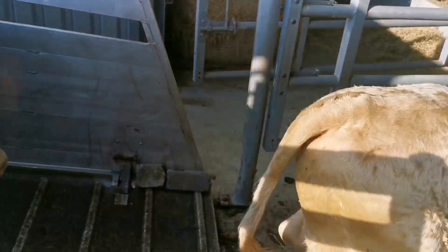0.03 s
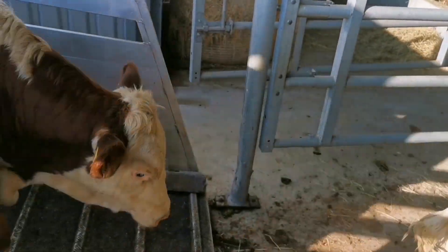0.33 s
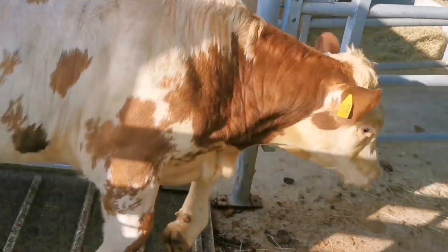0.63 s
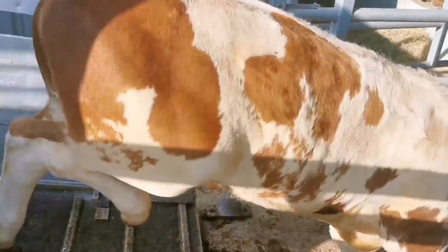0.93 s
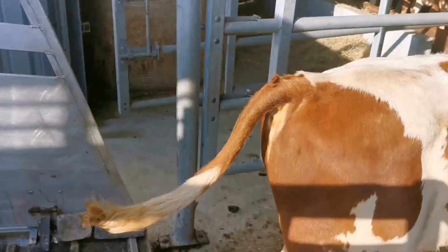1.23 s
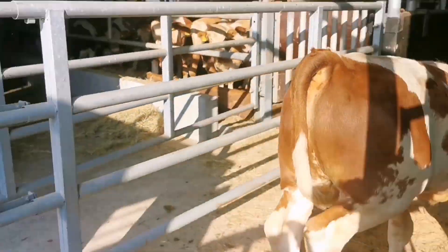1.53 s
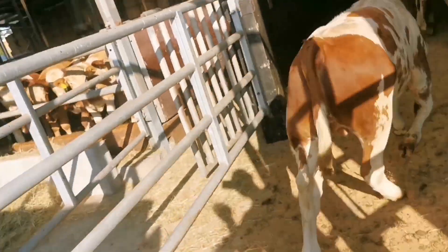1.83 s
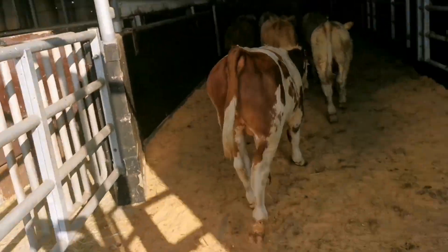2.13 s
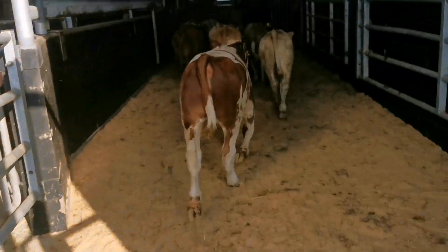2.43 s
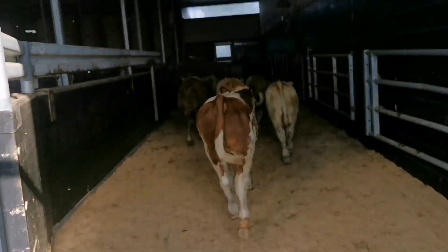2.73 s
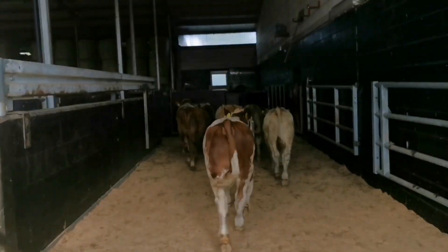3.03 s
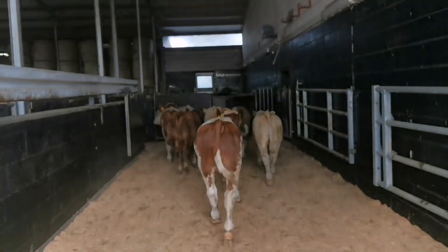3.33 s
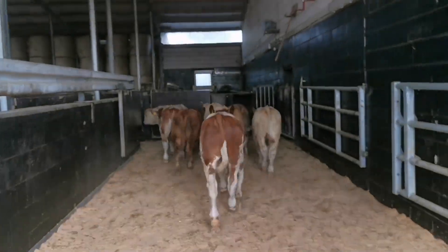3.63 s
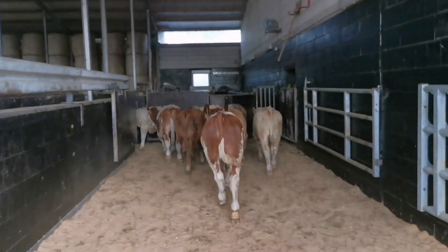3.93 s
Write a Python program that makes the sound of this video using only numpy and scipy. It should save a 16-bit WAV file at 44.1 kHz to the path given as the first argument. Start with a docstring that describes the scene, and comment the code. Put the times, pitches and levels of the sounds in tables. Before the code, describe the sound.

Heavy hooves clatter down a nearby metal ramp, with rattling panels, clanking hinges and a few ringing taps. Gritty scrapes lead into dull steps moving away across a barn floor, and a low, echoing moo rises at the end.

```python
"""Cattle walk down a metal trailer ramp into a barn. From the start, loose panels rattle over a low
rumble and a soft hush of air. Hinges and side gates clank, and each hoof booms on the deck and knocks
on its ribs; a few hard taps set the metal ringing. After a second, hooves begin to slide on grit.
Near two seconds the steps go on softly over the bedded floor. Last, a cow at the far end starts
a rising moo that fills the barn."""
import sys
import numpy as np
from scipy import signal
from scipy.fft import rfft, irfft
from scipy.io import wavfile
from scipy.ndimage import uniform_filter1d

SR = 44100
rng = np.random.default_rng(int(sys.argv[2]) if len(sys.argv) > 2 else 0)


def output_pcm(signal):
    """Save a mono or channel-first signal as 16-bit PCM at the path in sys.argv[1].

    Samples are clipped to [-1, 1] before scaling.
    """
    pcm = np.clip(np.atleast_2d(signal).T, -1, 1) * 32767
    wavfile.write(sys.argv[1], SR, np.round(pcm).astype(np.int16))


N = 176400
T = np.arange(N) / SR


def amp(db):
    """Turn decibels into a number to multiply by."""
    return 10 ** (np.asarray(db) / 20)


def unit(x):
    """Scale a sound so that its average strength (rms) is 1."""
    return x / np.sqrt(np.mean(x ** 2) + 1e-20)


def over_time(rows, column=1):
    """Join the points of a table with straight lines over time."""
    rows = np.array(rows)
    return np.interp(T, rows[:, 0], rows[:, column])


def at_hz(rows, hz, column=1):
    """Read a table at any frequency, with octaves evenly spaced."""
    rows = np.array(rows)
    return np.interp(np.log(np.maximum(hz, 1)), np.log(rows[:, 0]), rows[:, column])


# How sound reaches the two ears: (frequency [Hz], likeness [1 = the same], left minus right [dB])
EARS = [(141, 1, 5.5), (550, 0.7, -3), (1180, -.1, -4), (1930, 0, -11.5), (3880, 0.2, 5),
        (13000, 0.98, -10.5)]
def sides(hz):
    """Left and right gains at these frequencies."""
    gains = amp(np.array([[.5], [-.5]]) * at_hz(EARS, hz, column=2))
    return gains / np.sqrt(np.mean(gains ** 2, axis=0))


def noise(tone):
    """Stereo noise, shaped by a table of how strong each frequency is."""
    hz = np.arange(N // 2 + 1) * SR / N
    mid, side = rfft(rng.standard_normal((2, N)))
    alike = np.clip(at_hz(EARS, hz), -1, 1)
    pair = np.sqrt(1 + alike) * mid + np.sqrt(1 - alike) * side * [[1], [-1]]
    return unit(irfft(pair * sides(hz) * amp(at_hz(tone, hz)), N))


def decay(t60):
    """A fade that drops 60 dB in t60 seconds."""
    return np.exp(-np.log(1000) * T / t60)


def through(x, response):
    """Give every sample of x the same ring or echo."""
    return signal.fftconvolve(np.atleast_2d(x), np.atleast_2d(response), axes=1)[:, :N]


def clicks(times, gains):
    """One click at each time."""
    return np.bincount((np.clip(times, 0, None) * SR).astype(int), gains, N)[:N]


def bursts(times, db, tone, attack_s, t60, tail_db, tail_t60):
    """Each blow wakes a noisy blur of notes that falls fast, then lingers."""
    onset = 1 - np.exp(-T / attack_s)
    fade = decay(t60) ** 2 + amp(2 * tail_db) * decay(tail_t60) ** 2
    power = through(clicks(times, amp(2 * db)), onset ** 2 * fade)
    return np.sqrt(np.abs(power)) * noise(tone)


def sheet(tone, t60, tail_db, tail_t60):
    """Sheet metal struck once: a sharp crack and a longer ring."""
    contact = (1 - np.exp(-T / .0003)) ** 2
    return noise(tone) * contact * (decay(t60) + amp(tail_db) * decay(tail_t60))


def ring(times, db, notes, t60, spread_db):
    """Each blow rings all of an object's notes; spread_db varies their strength by chance."""
    out = 0
    fade = np.exp(-np.log(1000) / (t60 * SR))
    for (hz, level_db), chance in zip(notes, rng.standard_normal((len(times), len(notes))).T):
        turn = 2 * np.pi * hz / SR
        blows = clicks(times, amp(db + level_db + spread_db * chance)) + 1e-18
        note = signal.lfilter([0, np.sin(turn)], [1, -2 * fade * np.cos(turn), fade * fade], blows)
        out = out + sides(hz) * note
    return out


def grain(depth_db=2):
    """A fast, random flutter of level that sounds gritty."""
    return amp(depth_db * unit(uniform_filter1d(rng.standard_normal(N), size=90)))


# How hard the trailer shakes: (time [s], level [dB])
SHAKING = [(0, -29), (.62, -29.5), (.71, -34), (.85, -25), (1.03, -33.5), (1.14, -31), (1.44, -33),
           (1.53, -40.5), (1.76, -49), (1.86, -35.5), (2.1, -36), (2.5, -61)]
# Tone of the panels and of the rumble: (frequency [Hz], level [dB])
PANEL_TONE = [(150, 0), (290, 0.5), (480, -3.5), (680, -0.5), (1200, -9.5), (1950, -4), (2900, -20.5),
              (15000, -37.5)]
RUMBLE_TONE = [(15, 5), (38, 4.5), (200, -10.5), (1500, -67)]
def trailer(panels=6, rattles_per_s=260):
    """Loose panels rattle at random, each with its own ring, while the swaying trailer rumbles."""
    touches = rng.choice([-1, 1], N) * (rng.random(N) < rattles_per_s / SR)
    touched = rng.integers(0, panels, N)
    rattle = 0
    for k in range(panels):
        panel = sheet(PANEL_TONE, t60=0.059, tail_db=-15.5, tail_t60=0.56)
        rattle = rattle + through(touches * (touched == k), panel)
    shake_db = over_time(SHAKING)
    rumble = noise(RUMBLE_TONE) * amp(-14 + 0.66 * shake_db)
    return unit(rattle) * amp(shake_db) + rumble


# Tone of the background: (frequency [Hz], level [dB])
AIR_TONE = [(15, -44), (25, -13.5), (110, 1.5), (421, -18), (648, -18.5), (3530, -34), (6920, -33.5),
            (15500, -36.5)]
def still_air():
    """A soft, steady hush behind everything."""
    return amp(-45.5) * noise(AIR_TONE)


def chatter(times, db, touches=4, gap_s=.004, loss_db=1):
    """Metal parts bounce, so each hit becomes a quick, uneven run of weaker touches."""
    chance = rng.random((len(times), 2, touches))
    bounce = np.arange(touches)
    delay = gap_s * (bounce + chance[:, 0] * (bounce > 0))
    gains = amp(db[:, None] - loss_db * bounce) * np.sign(chance[:, 1] - .5)
    return clicks((times[:, None] + delay).ravel(), gains.ravel())


# Metal parts hit each other; the last row, at 1.822 s, is a hoof scraping hard on the floor: (time [s], clang
# level [dB], jingle level [dB])
GATE_HITS = [(.001, -21, -32.5), (.019, -30.5, -27.5), (.188, -27.5, -30), (.247, -29.5, -32.5),
             (0.367, -45, -36.5), (.424, -31, -32), (0.509, -36, -36.5), (.527, -33, -38),
             (0.587, -25, -37.5), (.798, -24.5, -36), (.9, -33, -37.5), (1.063, -27.5, -39.5),
             (1.123, -29.5, -44), (1.205, -25.5, -31), (1.284, -25, -32), (1.306, -42, -32.5),
             (1.403, -29, -40.5), (1.453, -37.5, -43), (1.822, -32.5, -39.5)]
# Their ringing notes, clang and jingle: (frequency [Hz], level [dB])
GATE_NOTES = [(1523, 4), (1660, 5), (2035, 7.5), (4185, -2.5), (5900, -3), (6345, -3.5), (6804, 1)]
CLANG_TONE = [(350, 3.5), (750, 0), (1900, 2.5), (2350, -0.5), (2850, -17), (5000, -15.5), (12000, -50.5)]
JINGLE_TONE = [(1200, -12), (4000, 1), (7200, 4.5), (7800, -6.5), (12500, -7.5), (16000, -58)]
def hinges_and_gates(parts=5):
    """Hinges and gates chatter in turn, each with its own clang, and a gritty jingle on top."""
    times, clang_db, jingle_db = np.transpose(GATE_HITS)
    jingle = bursts(times, jingle_db + 3, JINGLE_TONE, attack_s=.0025, t60=.07, tail_db=-10, tail_t60=.3)
    clangs = 0
    for k in range(parts):
        touches = chatter(times[k::parts], clang_db[k::parts] - 2)
        clangs = clangs + through(touches, sheet(CLANG_TONE, t60=0.024, tail_db=-3, tail_t60=0.38))
    gritty_jingle = jingle * grain()
    notes = ring(times + .004, jingle_db - 11, GATE_NOTES, t60=0.22, spread_db=1.5)
    return clangs + gritty_jingle + notes


# Hooves land on the ramp: (time [s], boom level [dB], knock level [dB])
RAMP_STEPS = [(.002, -26.5, -28.5), (.161, -27, -25.5), (0.309, -44, -23), (0.364, -16, -29.5),
              (0.431, -25, -27.5), (.486, -17.5, -25), (.503, -17.5, -28.5), (0.551, -18.5, -46),
              (0.582, -22, -26.5), (.618, -16.5, -37), (0.756, -31, -24.5), (0.799, -14.5, -22),
              (0.858, -24.5, -28)]
# The deck's low notes, boom and knock: (frequency [Hz], level [dB])
DECK_NOTES = [(82, -0.5), (139, -3.5), (186, -8.5), (262, -10)]
BOOM_TONE = [(25, -31), (90, 2.5), (150, -2.5), (230, -4), (320, -9), (1500, -44), (16000, -77)]
KNOCK_TONE = [(120, -10), (280, -1.5), (385, 3), (480, -4), (600, 5.5), (740, -10.5), (860, -12),
              (1020, -4.5), (1400, -9.5), (3000, -41.5)]
def hooves_on_ramp():
    """Each hoof makes the deck boom with low notes and knocks on its ribs."""
    times, boom_db, knock_db = np.transpose(RAMP_STEPS)
    notes = ring(times, boom_db - 1, DECK_NOTES, t60=0.26, spread_db=3)
    boom = bursts(times, boom_db - 1, BOOM_TONE, attack_s=.0023, t60=.092, tail_db=-10.5, tail_t60=.84)
    knock = bursts(times, knock_db + 2, KNOCK_TONE, attack_s=.0016, t60=.077, tail_db=-4, tail_t60=.58)
    return notes + boom + knock


# Hard taps on one spot of the metal: (time [s], pitch [Hz], level [dB])
HARD_TAPS = [(.246, 600, -17), (0.583, 366, -12.5), (1.064, 2340, -17.5), (1.125, 1810, -16)]
def metal_taps(detune=0.034, cycles=62):
    """Each tap rings two close notes that die away in a few dozen vibrations."""
    out = 0
    for start, hz, db in HARD_TAPS:
        pair = [(hz * (1 - detune), 0), (hz * (1 + detune), 0)]
        out = out + ring(np.array([start]), db, pair, t60=cycles / hz, spread_db=0) / 2
    return out


# Hooves slide on grit or bedding: (time [s], rise time [s], pitch [Hz], level [dB])
SCRAPES = [(1.055, 0.042, 11100, -41.5), (1.808, 0.028, 2870, -38), (1.912, 0.018, 1830, -29.5),
           (1.971, 0.024, 6900, -45), (2.68, 0.045, 620, -40), (2.765, 0.028, 11000, -55)]
def hoof_slides(db_per_octave=12):
    """Gritty scrapes swell and die away, each around its own pitch."""
    out = 0
    for start, rise, hz, db in SCRAPES:
        tone = [(hz * 2. ** octave, -db_per_octave * abs(octave)) for octave in range(-8, 9)]
        age = np.maximum(T - start, 0) / rise
        swell = (age * np.exp(1 - age)) ** 2
        out = out + amp(db) * swell * noise(tone)
    return out * grain()


# Hooves land on the barn floor: (time [s], thud level [dB], scuff level [dB])
FLOOR_STEPS = [(1.883, -34, -50), (1.988, -23.5, -34), (2.028, -22, -31), (2.098, -27, -35.5),
               (2.212, -39, -39), (2.269, -53, -35), (2.336, -48, -39.5), (2.612, -32, -40.5),
               (2.758, -37, -38.5), (2.917, -39, -53), (3.214, -38, -65), (3.267, -38.5, -49),
               (3.441, -40, -48)]
# Tone of the three parts of a step: (frequency [Hz], level [dB])
THUD_TONE = [(30, -7.5), (80, -3), (130, 5.5), (185, 2.5), (300, -11.5), (1500, -58)]
SCUFF_TONE = [(150, -0.5), (650, 3), (1100, 0), (2800, -28), (16000, -73)]
CRUNCH_TONE = [(500, -1.5), (1500, 2.5), (2400, 0), (12000, -42)]
def barn_steps(fade_db_per_s=20.5):
    """Dull thuds and soft scuffs on the bedding; the crunch of grit fades as the cow walks away."""
    times, thud_db, scuff_db = np.transpose(FLOOR_STEPS)
    crunch_db = scuff_db + 1 - fade_db_per_s * np.maximum(times - 2, 0)
    low_note = ring(times, thud_db, [(122, -6)], t60=0.31, spread_db=3.5)
    thud = bursts(times, thud_db + 1, THUD_TONE, attack_s=.0031, t60=.21, tail_db=-8.5, tail_t60=.47)
    scuff = bursts(times, scuff_db, SCUFF_TONE, attack_s=.002, t60=.042, tail_db=-4, tail_t60=.55)
    crunch = bursts(times, crunch_db, CRUNCH_TONE, attack_s=.0015, t60=.056, tail_db=-1.5, tail_t60=.3)
    return low_note + thud + scuff + crunch


# The rising call: (time [s], pitch [Hz], level [dB])
CALL = [(3.22, 84.7, -60), (3.39, 92.06, -45), (3.5, 104.1, -37.5), (3.58, 115.8, -33.5),
        (3.68, 128.2, -33), (3.8, 135.3, -34.5), (4, 145.8, -31.5)]
# How the throat shapes the voice: (frequency [Hz], level [dB])
THROAT_TONE = [(200, -15), (275, 1), (350, 5), (430, -7), (700, -2), (930, -16.5), (1200, -4), (1350, -16),
               (1510, -2), (1680, -14.5), (1980, -7.5), (3000, -23.5), (4500, -40), (14000, -40.5)]
def moo(mouth_opens_s=3.56, opening_s=0.23, muffle_db=11, muffle_above_hz=344.6):
    """Vocal folds buzz higher and higher, a little roughly; the mouth opens and the barn echoes."""
    wobble = unit(uniform_filter1d(uniform_filter1d(rng.standard_normal(N), size=300), size=300))
    pitch = over_time(CALL) * (1 + 0.0038 * wobble)
    phase = 2 * np.pi * np.cumsum(pitch) / SR
    calling = T > CALL[0][0]
    closed = 1 - np.clip((T[calling] - mouth_opens_s) / opening_s, 0, 1)
    voice = np.zeros(N)
    for harmonic in range(1, 70):
        hz = harmonic * pitch[calling]
        # A closed mouth muffles the higher notes.
        db = at_hz(THROAT_TONE, hz) - muffle_db * closed * (hz > muffle_above_hz)
        voice[calling] += amp(db) * np.sin(harmonic * phase[calling])
    voice[calling] = unit(voice[calling])
    rasp = amp(-13.5) * noise(THROAT_TONE)[1] * (1 + np.cos(phase))
    call = (voice + rasp) * calling * amp(over_time(CALL, column=2))
    barn_echo = unit(noise([(100, 0)]) * decay(t60=0.96)) / np.sqrt(N)
    balance = sides(np.arange(N + 1) * SR / (2 * N))
    direct = irfft(rfft(call, 2 * N) * balance)[:, :N]
    return amp(-3.5) * direct + amp(4) * through(call, barn_echo)


def scene():
    """Add up the sounds in the order they begin."""
    return (trailer() + still_air() + hinges_and_gates() + hooves_on_ramp() + metal_taps()
            + hoof_slides() + barn_steps() + moo())


def record(dry):
    """Cut away the very highest treble."""
    cutoff_hz = 15700
    return signal.sosfilt(signal.ellip(14, .1, 90, cutoff_hz, fs=SR, output="sos"), dry)


dry = scene()
out = record(dry)
output_pcm(out)
```